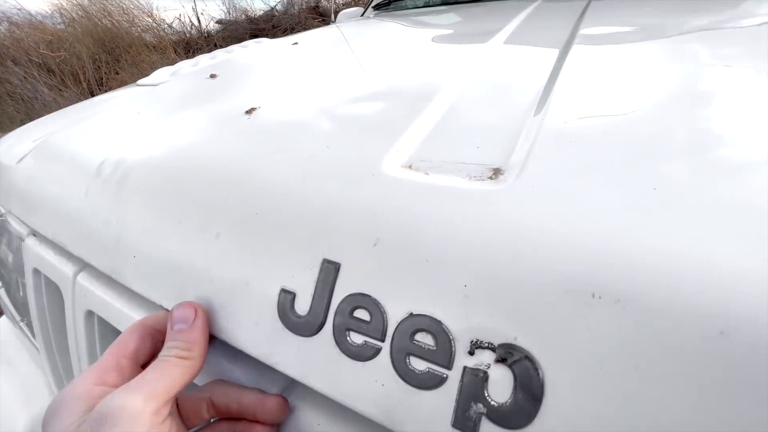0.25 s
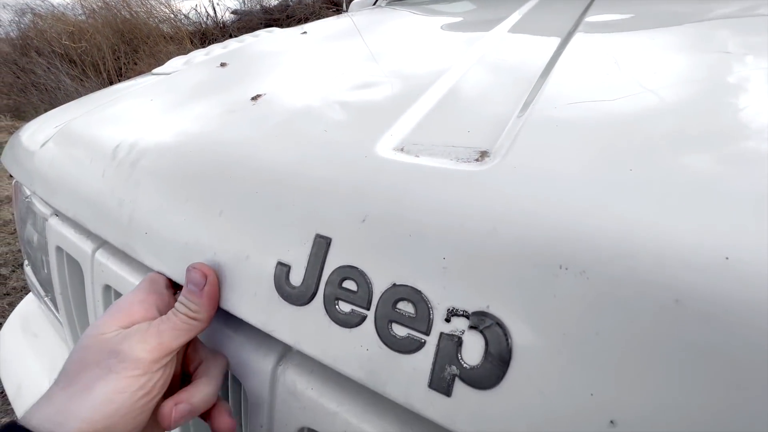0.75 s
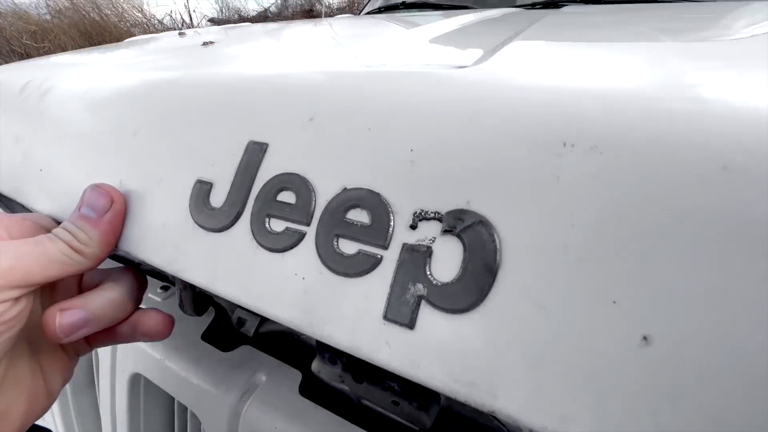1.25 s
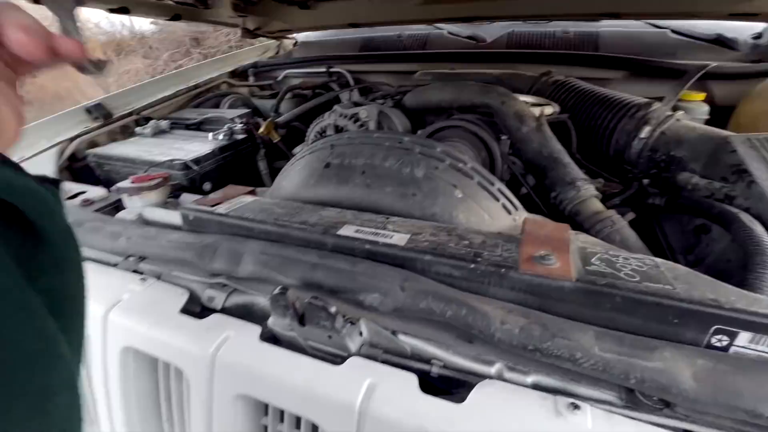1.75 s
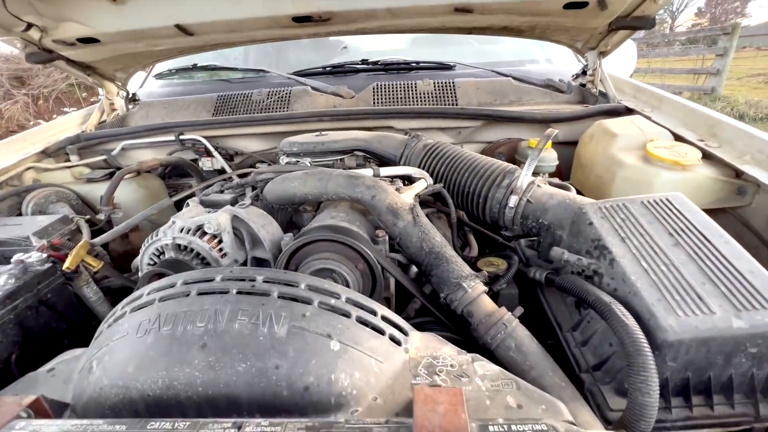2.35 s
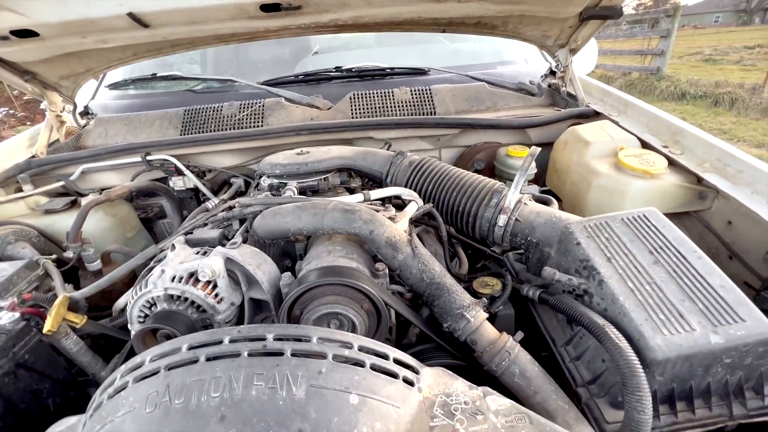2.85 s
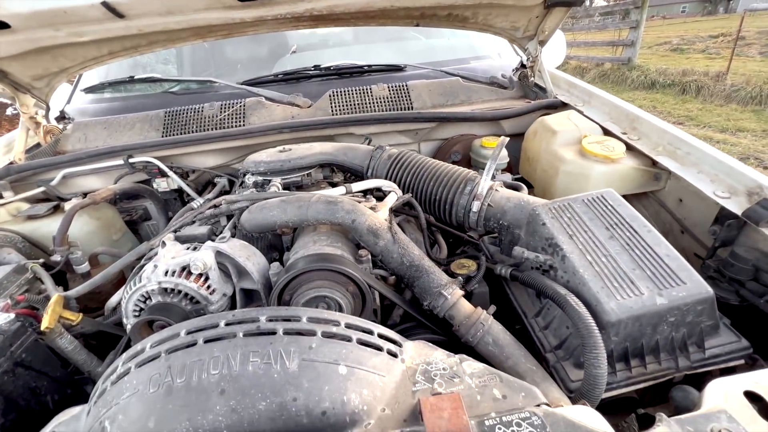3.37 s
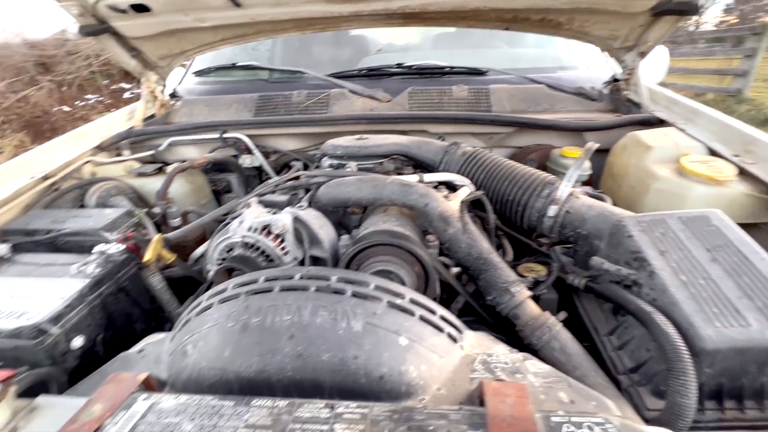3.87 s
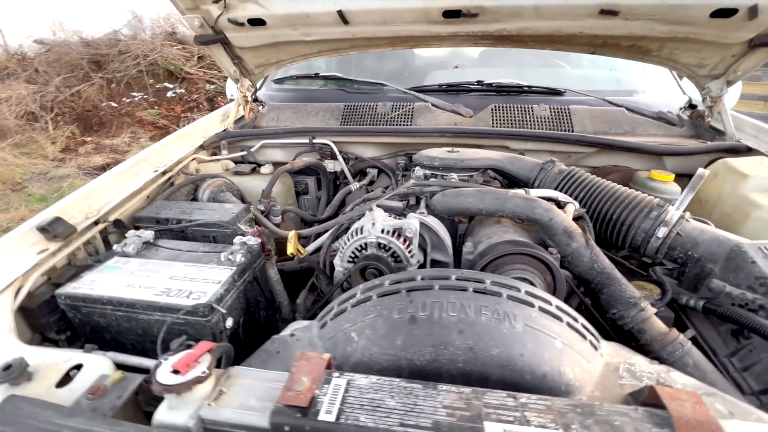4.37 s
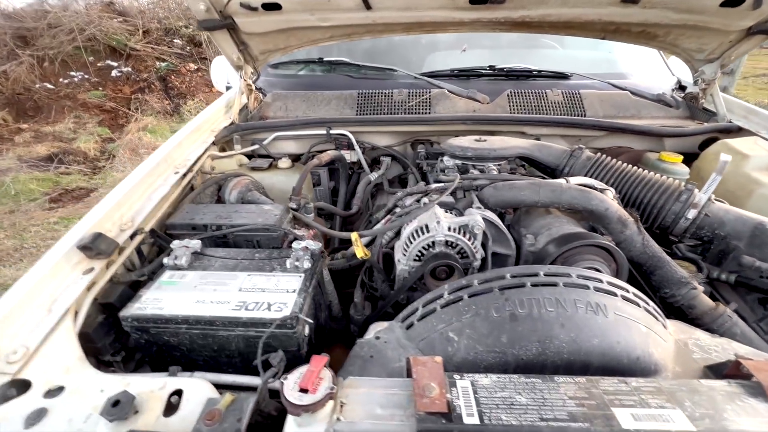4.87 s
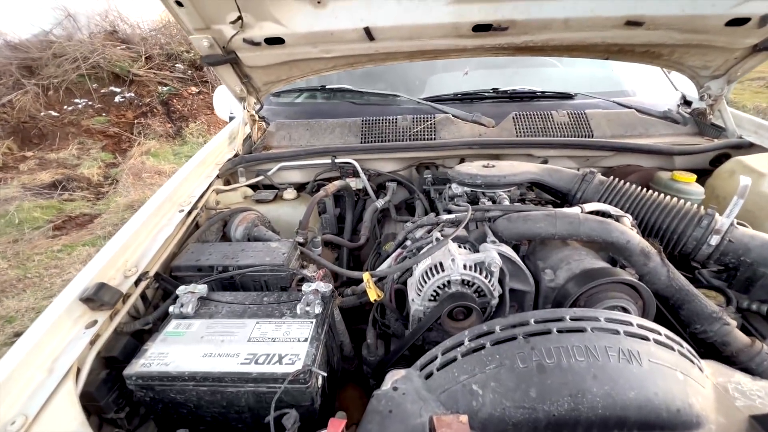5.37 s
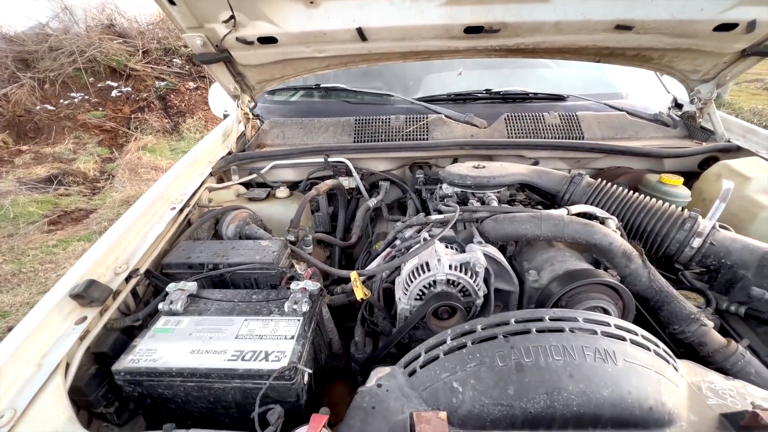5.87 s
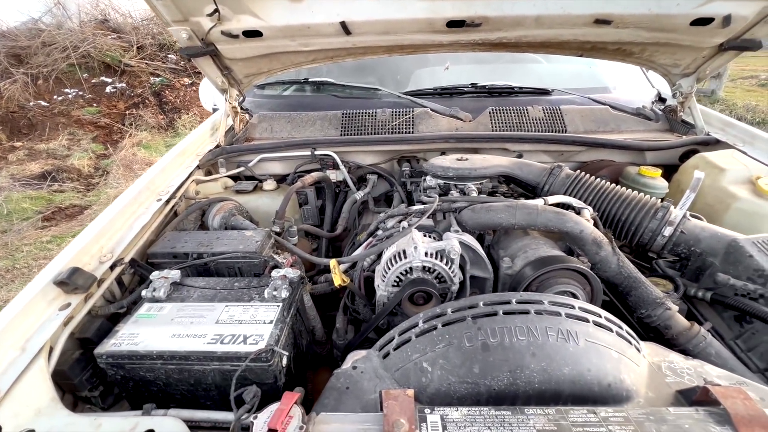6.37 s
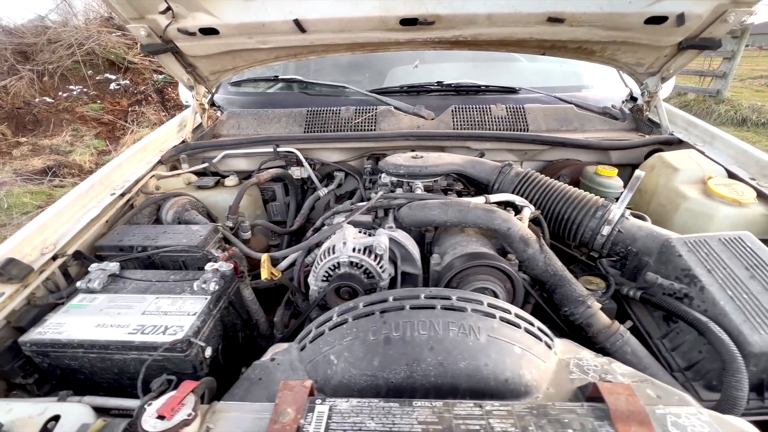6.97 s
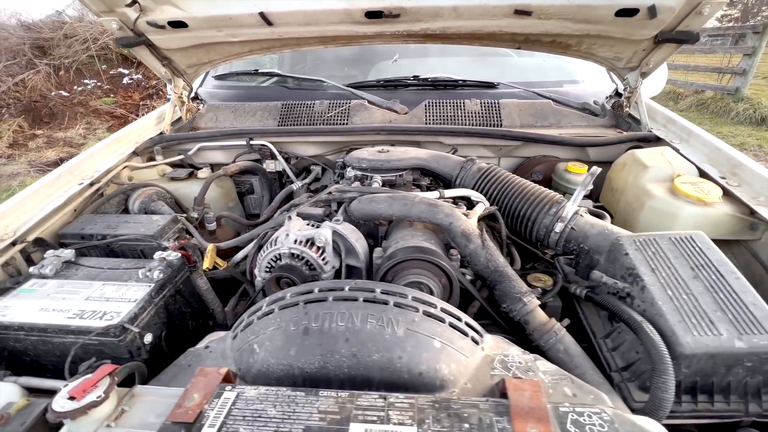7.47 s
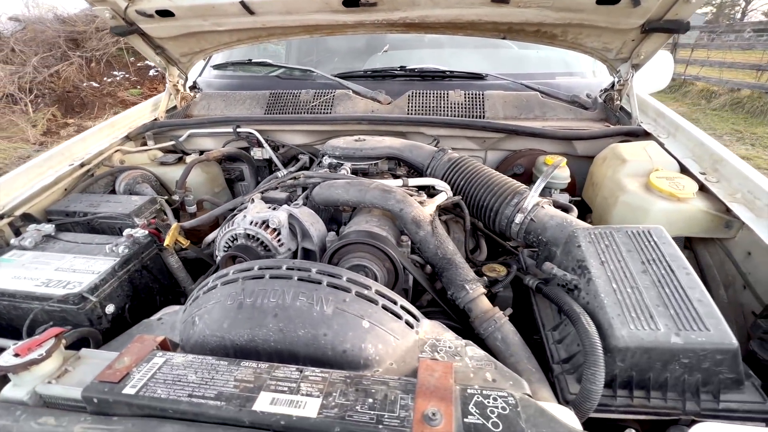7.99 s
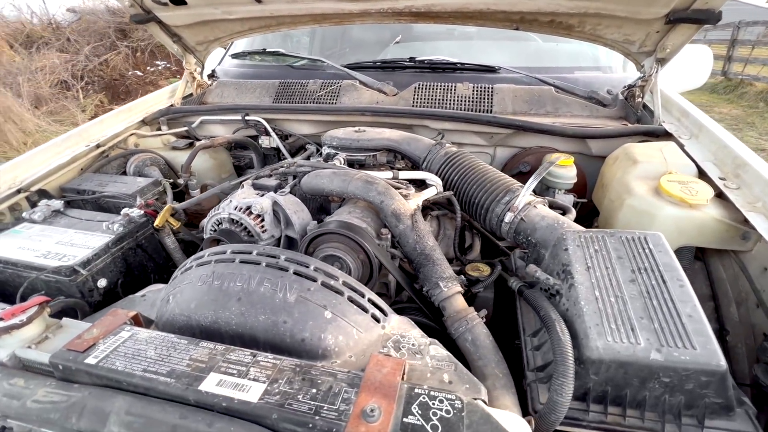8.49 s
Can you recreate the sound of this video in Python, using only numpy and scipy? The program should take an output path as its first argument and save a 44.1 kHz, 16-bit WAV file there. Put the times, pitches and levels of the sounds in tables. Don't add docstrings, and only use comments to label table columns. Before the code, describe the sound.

Outdoors, a large petrol engine idles steadily with a lumpy low throb and fan rush. A worn belt squeals very high, hissing, chirping and groaning in a quick repeating pattern. Light hood knocks lead to a squeaky latch and solid clunk just after one second; the hood rises, the belt hiss grows clearer, and a strut whistles faintly. A close hand-held stereo microphone then slowly backs away.

```python
import sys
import numpy as np
from scipy import signal
from scipy.fft import rfft, irfft, next_fast_len
from scipy.io import wavfile

SR = 44100
rng = np.random.default_rng(int(sys.argv[2]) if len(sys.argv) > 2 else 0)


def convert_level_to_amplitude(level_db):
    exponent = np.asarray(level_db, float) / 20
    return 10 ** exponent


def pcm_store(signal):
    levels = np.round(np.clip(np.atleast_2d(signal), -1, 1) * 32767)
    wavfile.write(sys.argv[1], SR, levels.astype(np.int16).T)


N = 384993

# time in seconds, four-stroke cycles completed.
CRANK_CYCLES = [(0.0, -0.005), (0.25, 1.47), (0.75, 4.428), (1.2, 7.082), (2.0, 11.769), (2.3, 13.537),
                (3.0, 17.658), (3.4, 20.007), (4.0, 23.555), (4.25, 25.027), (5.25, 30.867), (6.0, 35.261),
                (6.5, 38.205), (7.25, 42.614), (8.05, 47.294), (8.73, 51.3)]
# strength in dB, arrival shift along its pipe in ms.
FIRINGS = [(-32.5, 4.28), (-25.4, -1.65), (-23.1, -3.26), (-30.0, 4.39), (-20.5, -3.16), (-30.3, -2.98),
           (-27.3, -0.45), (-19.8, -2.62)]
# frequency in Hz, width in Hz, level in dB.
PIPE_MODES = [(53.4, 3.0, 12.3), (60.8, 12.1, 8.7), (81.4, 3.0, 18.8), (156.2, 4.0, -7.6)]
# frequency in Hz, level in dB per Hz.
RUMBLE_COLOUR = [(25, -26), (33, -25), (45, -3), (70, -0.5), (100, -6), (130, -14.5), (200, -55)]
IDLE_HZ, PULSE_HZ, LOW_CUT_HZ = 5.872, 60, 60
CYCLES_PER_LAP = 2.0143

# frequency in Hz, level in dB per Hz.
BAY_COLOUR = [(210, -43), (350, -6), (454, -4), (516, -5.5), (675, -8.5), (900, -8), (1090, -6), (1190, -9),
              (1320, -6), (1440, -6.5), (2490, -19), (3200, -18), (4160, -47), (7040, -120)]
# frequency in Hz, level in dB per Hz.
DRUM_COLOUR = [(110, -22), (150, 5), (220, -8.5), (320, -6), (450, -6.5), (650, -35)]
# time in seconds, drumming level in dB.
BODY_SHAKES = [
    (1.2, -32),
    (1.8, -34.5),
    (3.05, -31.5),
]
SHAKE_RISE_MS, SHAKE_FALL_MS = 51, 430

# time in seconds, peak in dB.
HOOD_KNOCKS = [(0.402, -29), (0.794, -20), (1.182, -24), (1.212, -16), (1.368, -12), (1.384, -7.5),
               (1.505, -26), (1.716, -25), (1.816, -23), (1.91, -16), (2.015, -28), (3.043, -28)]
# frequency in Hz, level in dB, 60 dB decay in seconds.
SHEET_MODES = [(216, 1.5, 0.08), (282, 1, 0.089), (424, 4.5, 0.09), (467, -9, 0.11), (625, -34, .04)]
# time in seconds, peak in dB.
LATCH_CATCHES = [(1.192, -31), (1.334, -23), (1.352, -19), (1.363, -17), (1.372, -20)]
LATCH_HZ, LATCH_DB_PER_MS = 1825, 1.1
# time in seconds, pitch in Hz, level in dB.
STRUT_WHISTLE = [(2.12, 1720, -60), (2.18, 1680, -44), (2.25, 1580, -44), (2.33, 1550, -45),
                 (2.37, 1500, -52), (2.395, 1490, -35), (2.42, 1480, -54), (2.475, 1460, -33),
                 (2.51, 1450, -60)]

# time in seconds, frequency in Hz.
SQUEAL_PITCH = [(0.0, 6530), (0.31, 6610), (0.92, 6810), (1.09, 6570), (4.91, 6724), (5.11, 6515),
                (5.71, 6695), (6.52, 6580), (6.83, 6780), (8.31, 6610), (8.73, 6620)]
# time in seconds, squeal level in dB.
SLIP_LEVEL = [(0.0, -29.5), (0.36, -25.5), (0.5, -27.5), (1.03, -29), (1.12, -24), (1.29, -24.5),
              (1.36, -19.5), (1.45, -21.5), (1.85, -18), (2.26, -22.5), (2.84, -18.5), (2.92, -23.5),
              (5.01, -22.5), (6.12, -21), (6.9, -25.5), (7.1, -22), (7.66, -24), (8.73, -23)]
# frequency in Hz, level in dB per Hz.
HISS_COLOUR = [(2500, -19.5), (3200, -8), (3900, -1.5), (5000, -0.5), (5800, -2.5), (7000, 6), (8000, 1),
               (9000, -5.5), (10000, -2), (11000, -0.5), (12300, -4), (13400, -1.5), (14500, -1.5),
               (16000, -14)]
# time in seconds, peak in dB, pitch in Hz.
GROAN_SLIPS = [(0.1277, -27, 1110), (0.3572, -21, 1085), (0.5511, -34, 1080), (0.621, -25, 1110),
               (0.6706, -25, 1069), (0.8117, -28.5, 1145), (1.047, -20, 1100), (1.3064, -21.5, 1100),
               (1.495, -28, 1110), (1.9849, -27.5, 1154), (2.1821, -29, 1073), (2.4264, -19.5, 1095),
               (2.6773, -28.5, 1089), (3.4321, -30, 1053), (3.5514, -23.5, 1082), (4.5786, -27.5, 1122),
               (4.7326, -29.5, 1098), (4.9234, -31, 1097), (5.1255, -29.5, 1070), (5.8438, -40, 1111),
               (6.799, -24, 1073), (6.981, -33, 1098), (7.6687, -28, 1090), (7.8224, -33, 1080),
               (8.2465, -34, 1080), (8.3626, -32, 1103), (8.5647, -27.5, 1092), (8.7043, -28, 1100)]
# time in seconds, peak in dB, pitch in Hz.
PULLEY_CHIRPS = [(0.2853, -30.5, 3850), (0.4135, -26, 4200), (0.7106, -24, 3930), (0.8407, -26.5, 3970),
                 (1.043, -26, 3860), (1.1884, -25, 3610), (1.3285, -21, 3570), (1.4674, -26, 3690),
                 (1.5277, -27, 3790), (1.8741, -27, 3690), (1.9784, -23.5, 3640), (2.656, -27, 4270),
                 (2.808, -25, 4180), (2.9602, -28, 3810), (3.0011, -29, 3850), (3.2314, -22, 3980),
                 (3.3001, -27, 4000), (3.5722, -23, 4230), (3.6386, -26, 4100), (3.9239, -36, 3990),
                 (3.9915, -29, 3760), (4.0756, -29, 3770), (4.6942, -32, 3660), (4.9177, -35, 4350),
                 (6.7404, -31, 3560), (6.8279, -28, 3780), (7.0858, -30, 3720), (7.1692, -29, 3810),
                 (7.234, -31, 3920), (7.599, -30, 3830)]
# time in seconds, peak in dB.
BELT_SNAPS = [(0.3464, -15.5), (0.84, -15), (1.253, -14), (1.336, -10), (2.1705, -11), (2.6394, -13.5),
              (3.2828, -13), (3.5256, -5.5), (3.6242, -9.5), (4.225, -6.5), (4.2755, -11.5), (4.345, -14),
              (4.573, -8), (4.9088, -13.5), (5.3407, -5.5), (5.6017, -7), (5.9806, -9.5), (6.093, -8.5),
              (6.2884, -7), (6.9726, -12), (7.0904, -9), (7.122, -13.5), (7.164, -9), (7.3607, -12),
              (7.662, -9.5), (8.154, -9), (8.3454, -15.5)]
# place as share of a lap, squeal shift in Hz, squeal in dB, hiss in dB.
WORN_SPOTS = [(0.032, -150, 2.5, 10.5), (0.082, -110, 4, 10), (0.139, -50, 6.5, 4), (.22, 4.5, 5, 5.5),
              (0.279, -70.5, 3.5, 9.5), (.345, -220, 5.5, 7.5), (.385, -280, 3, 5.5),
              (0.452, -9.5, -0.5, 6), (0.506, 40.5, 3.5, 7), (0.599, -170, 7, 7), (.69, 30, 4.5, 5.5),
              (0.772, -40, 3, 5.5), (0.819, -210, 6.5, 8.5), (.89, -90, 6.5, 2), (0.939, -170, 6, 4.5),
              (0.988, -130, 5, 6.5)]
WORN_LENGTH = 0.018
SOUND_SHIFT_HZ, SOUND_SQUEAL_DB, SOUND_HISS_DB = 77.6, 1.98, 0
# place as share of a lap, height in dB, length as share of a lap.
GLAZED_STRETCHES = [(0.078, 18.5, 0.12), (.21, 10.5, 0.11), (.31, 0, .015), (.385, 17.5, 0.025),
                    (.475, 11.5, 0.017), (.6, 14.5, 0.04), (.7, 3, .03), (.84, 4.5, .025), (.93, 9, 0.037)]
HISS_FOLLOWS_SLIP, SLIP_MEAN_DB = 0.15, -24.5

# frequency in Hz, share 0 to 1.
PORT_LIKENESS = [(60, .99), (130, .96), (290, .7), (640, .48), (1400, .25), (3000, .12), (9000, .15),
                 (9800, .97), (16000, .98)]
# frequency in Hz, left over right in dB.
PORT_BALANCE = [(60, 5.5), (200, 0.5), (800, 5.5), (1800, 1), (3000, 3.5), (4500, 2), (5800, 17),
                (7000, 16.5), (8500, 0.5), (15000, -0.5)]
PORT_LAG = 11
# time in seconds, exhaust level in dB.
CLOSENESS = [(0.0, -10), (1.1, -10.5), (1.85, -11), (2.3, -12.5), (3.4, -14), (5.0, -15), (6.9, -16),
             (8.73, -17.5)]
LIFT_START_S, LIFT_END_S = 1.25, 1.78
# level in dB at the start, share of the backing away, dB gained when uncovered.
BAY_HEARD, HISS_HEARD, DRUM_HEARD = (-35.5, 0.84, 1.44), (-37.5, 0.91, 6.8), (-29.5, 1.56, 0.092)


def rms_one(x):
    return x / np.sqrt(np.mean(np.abs(x) ** 2) + 1e-20)


def in_time(rows):
    s, *columns = np.transpose(rows)
    return [np.interp(np.arange(N) / SR, s, column) for column in columns]


def at_hz(points, hz):
    point_hz, value = np.transpose(points)
    return np.interp(np.log(hz + 1), np.log(point_hz), value)


def drift(rate_hz, channels=1):
    r = np.exp(-2 * np.pi * rate_hz / SR)
    noise = rng.standard_normal((channels, N + SR))
    return rms_one(signal.lfilter([1], [1, -2 * r, r * r], noise)[:, SR:])


def wobbly_tone(hz, width_hz, steady, channels=1):
    shake = drift(width_hz, channels) + 1j * drift(width_hz, channels)
    phase = 2 * np.pi * np.cumsum(hz + np.zeros(N)) / SR
    return rms_one((steady + shake) * np.exp(1j * phase))


def coloured_noise(spectrum, lag, edges_hz=(), patchy_db=0):
    size = next_fast_len(N)
    hz = np.arange(size // 2 + 1) * SR / size
    shared, left, right = rfft(rng.standard_normal((3, size)))
    alike = at_hz(PORT_LIKENESS, hz)
    late = np.exp(-2j * np.pi * hz * lag / SR)
    common = np.array([late * shared, shared])
    pair = np.sqrt(alike) * common + np.sqrt(1 - alike) * np.array([left, right])
    balance_db = at_hz(PORT_BALANCE, hz) * np.array([[0.5], [-0.5]])
    pair = pair * convert_level_to_amplitude(balance_db + at_hz(spectrum, hz))
    band = np.searchsorted(edges_hz, hz)
    flicker = convert_level_to_amplitude(patchy_db * drift(27.4, len(edges_hz) + 1))
    noise = np.zeros((2, N))
    for k, gain in enumerate(flicker):
        noise += irfft(pair * (band == k), size)[:, :N] * gain
    return rms_one(noise)


def swells(s, db, rise_ms, fall_ms):
    clicks = np.full(N, 1e-18)
    clicks[(s * SR).astype(int)] = convert_level_to_amplitude(db)
    rise, fall = np.exp(-1000 / SR / rise_ms), np.exp(-1000 / SR / fall_ms)
    return signal.lfilter([1 - rise], np.convolve([1, -rise], [1, -fall]), clicks)


def bursts(rows, rise_ms, fall_ms, width_hz):
    s, db, hz = np.transpose(rows)
    latest = np.maximum(np.searchsorted(s, np.arange(N) / SR) - 1, 0)
    tone = wobbly_tone(hz[latest], width_hz, steady=0.65, channels=2).real
    return swells(s, db, rise_ms, fall_ms) * tone


def spots(lap, share, length, height):
    grid = np.linspace(0, 1, 513)
    apart = (grid[:, None] - share + 0.5) % 1 - 0.5
    return np.interp(lap % 1, grid, np.exp(-0.5 * (apart / length) ** 2) @ height)


def turning(turns, peak_at):
    return np.cos(2 * np.pi * (turns - peak_at))


def heard(layer):
    start_db, share, open_db = layer
    uncovered = np.clip((np.arange(N) / SR - LIFT_START_S) / (LIFT_END_S - LIFT_START_S), 0, 1)
    return start_db + share * (in_time(CLOSENESS)[0] - CLOSENESS[0][1]) + open_db * uncovered


def firing_pulses(cycles):
    order = np.arange(3, 34)
    hz = order * IDLE_HZ
    db, shift_ms = np.transpose(FIRINGS)
    delays = np.outer(order, np.arange(8) / 8) + np.outer(hz, shift_ms / 1000)
    firings = np.exp(-2j * np.pi * delays) @ convert_level_to_amplitude(db)
    s = 1j * hz
    pipe = 0
    for k, (mode_hz, width, mode_db) in enumerate(PIPE_MODES):
        pipe = pipe + (-1) ** k * convert_level_to_amplitude(mode_db) * width * s / (s * s + width * s + mode_hz * mode_hz)
    heights = firings * pipe * (s / (s + LOW_CUT_HZ)) ** 2 / (1 + s / PULSE_HZ) ** 2
    coarse = cycles[::20]
    wave = np.real(np.exp(2j * np.pi * np.outer(coarse, order)) @ heights)
    wave = signal.resample_poly(wave, 20, 1)[:N]
    return rms_one(wave) * convert_level_to_amplitude(0.49 * drift(8.0)[0])


def exhaust(cycles):
    pulse = firing_pulses(cycles)
    both = np.vstack([np.roll(pulse, 6), pulse])
    rumble = coloured_noise(RUMBLE_COLOUR, 0)
    return convert_level_to_amplitude(in_time(CLOSENESS)[0]) * (both * convert_level_to_amplitude([[0.5], [-0.5]]) + convert_level_to_amplitude(-15.0) * rumble)


def panels(cycles):
    intake = np.cos(2 * np.pi * 24 * cycles) + 0.7 * np.cos(2 * np.pi * (26 * cycles + 1 / 8))
    shakes = swells(*np.transpose(BODY_SHAKES), SHAKE_RISE_MS, SHAKE_FALL_MS)
    drumming = convert_level_to_amplitude(-2.5) * coloured_noise(DRUM_COLOUR, 0) + convert_level_to_amplitude(-1.0) * intake
    return (convert_level_to_amplitude(heard(DRUM_HEARD)) + shakes) * drumming


def bay(cycles):
    noise = coloured_noise(BAY_COLOUR, 0, (700, 1500), patchy_db=1.5)
    hum = convert_level_to_amplitude(-10.0 + 10.8 * turning(cycles, 0.28)) * wobbly_tone(445, 32, steady=0.092)
    upper = convert_level_to_amplitude(-13.5 + 6.6 * turning(cycles, 0.9)) * wobbly_tone(790, 21, steady=0.1, channels=2)
    whine = convert_level_to_amplitude(-6.5) * wobbly_tone(1285, 16, steady=0.34, channels=2)
    return convert_level_to_amplitude(heard(BAY_HEARD)) * (noise + (hum + upper + whine).real)


def hood_knocks():
    s, db = np.transpose(HOOD_KNOCKS)
    out = np.zeros(N)
    for hz, level_db, t60 in SHEET_MODES:
        clicks = np.full(N, 1e-18)
        clicks[(s * SR).astype(int)] = convert_level_to_amplitude(db + level_db - 7.5 + rng.normal(0, 1.3, len(s)))
        r, w = convert_level_to_amplitude(-60 / (t60 * SR)), 2 * np.pi * hz / SR
        out += signal.lfilter([0, np.sin(w)], [1, -2 * r * np.cos(w), r * r], clicks)
    return signal.sosfilt(signal.butter(2, 900, fs=SR, output="sos"), out)


def latch():
    ms = np.arange(N) / SR * 1000
    catches = [peak_db - LATCH_DB_PER_MS * abs(ms - 1000 * at) for at, peak_db in LATCH_CATCHES]
    scrape = wobbly_tone(LATCH_HZ, 42, steady=5)[0]
    octave, third = rms_one(scrape ** 2), rms_one(scrape ** 3)
    return convert_level_to_amplitude(np.max(catches, axis=0)) * (convert_level_to_amplitude(-8) * scrape + convert_level_to_amplitude(-11) * third + octave).real


def strut():
    hz, db = in_time(STRUT_WHISTLE)
    return convert_level_to_amplitude(db) * wobbly_tone(hz, 32, steady=6.5)[0].real


def belt_squeal(pitch, gain, jolt):
    tone = wobbly_tone(pitch, 160, steady=0.8, channels=2).real * gain * convert_level_to_amplitude([[4], [-6]])
    octave = wobbly_tone(2 * pitch, 270, steady=0.38)[0].real * gain[0] * convert_level_to_amplitude(-17 + 6 * jolt)
    return tone + np.vstack([np.roll(octave, PORT_LAG), octave])


def belt_hiss(cycles, hiss_db, scuff_db, grip_db, snap):
    firing_db = 1.3 * turning(8 * cycles, 0.35) + turning(4 * cycles, 0.88)
    rub = convert_level_to_amplitude(hiss_db + 4.5 + scuff_db + firing_db + 1.74 * drift(38) + grip_db) + 0.021 * snap
    edges_hz = (3600, 4200, 4800, 5400, 6000, 7500, 9400, 11500)
    return rub * coloured_noise(HISS_COLOUR, PORT_LAG, edges_hz, patchy_db=3.5)


def belt_groan(lap, hiss_db):
    share, height, length = np.transpose(GLAZED_STRETCHES)
    groan_db = spots(lap, share, length, height) - 8
    groan = wobbly_tone(1095 + 25 * drift(5.34)[0], 44, steady=0.69, channels=2).real
    groan = groan * convert_level_to_amplitude(-43.0 + 0.75 * groan_db)
    slips = convert_level_to_amplitude(1.5) * bursts(GROAN_SLIPS, 0.97, 26.6, 24)
    chirps = convert_level_to_amplitude(5.5) * bursts(PULLEY_CHIRPS, 5.1, 8.7, 200)
    idler_gain = convert_level_to_amplitude(hiss_db - 10.5 + 8.2 * turning(3 * lap, 0.19) + 2.1 * drift(20))
    idler = idler_gain * wobbly_tone(3850 + 180 * drift(6)[0], 130, steady=1.0, channels=2).real
    return (groan + slips + chirps + idler) * convert_level_to_amplitude([[1.5], [-1.5]])


def belt(cycles):
    lap = cycles / CYCLES_PER_LAP
    squeal_db, = in_time(SLIP_LEVEL)
    hiss_db = heard(HISS_HEARD) + HISS_FOLLOWS_SLIP * (squeal_db - SLIP_MEAN_DB)
    share, shift, worn, scuff = np.transpose(WORN_SPOTS)
    shift_hz = spots(lap, share, WORN_LENGTH, shift) + SOUND_SHIFT_HZ
    worn_db = spots(lap, share, WORN_LENGTH, worn) + SOUND_SQUEAL_DB
    scuff_db = spots(lap, share, WORN_LENGTH, scuff) + SOUND_HISS_DB
    snap = swells(*np.transpose(BELT_SNAPS), rise_ms=0.8, fall_ms=10)
    jolt = np.tanh(snap / convert_level_to_amplitude(squeal_db + 8.5))
    pitch = in_time(SQUEAL_PITCH)[0] + 1.5 * shift_hz - 350 * jolt + 70 * drift(30)[0]
    coming = np.roll(jolt, -SR // 100)
    grip_db = 4 * jolt - 7.5 * coming * (1 - jolt) ** 2
    squeal_gain = convert_level_to_amplitude(squeal_db - 2.5 + worn_db + 0.57 * drift(23) + grip_db)
    squeal = belt_squeal(pitch, squeal_gain, jolt)
    hiss = belt_hiss(cycles, hiss_db, scuff_db, grip_db, snap)
    return squeal + hiss + belt_groan(lap, hiss_db)


def scene():
    cycles, = in_time(CRANK_CYCLES)
    engine = exhaust(cycles) + panels(cycles) + bay(cycles)
    hood = (hood_knocks() + latch() + strut()) * convert_level_to_amplitude([[1.2], [-1.2]])
    return engine + hood + belt(cycles)


def top_cut(x):
    return signal.sosfilt(signal.butter(12, 15710, fs=SR, output="sos"), x)


def record(dry):
    limited = 0.9 * dry / (0.9 ** 6 + dry ** 6) ** (1 / 6)
    return top_cut(limited)


dry = scene()
out = record(dry)
pcm_store(out)
```